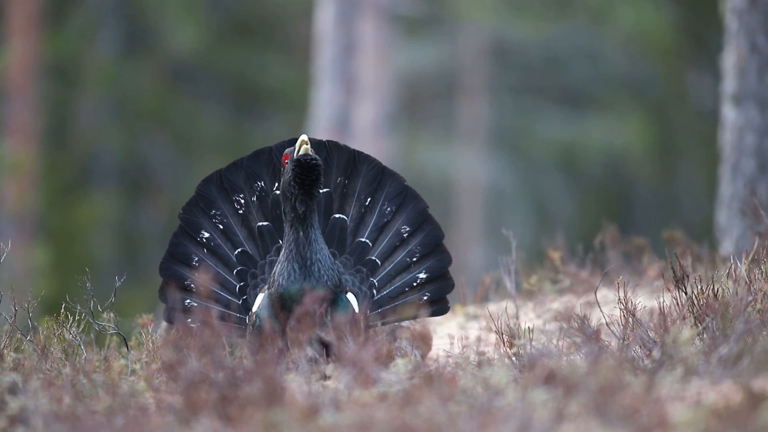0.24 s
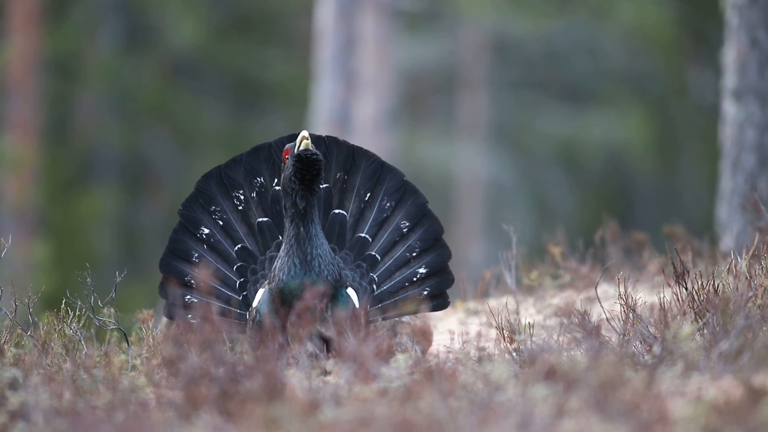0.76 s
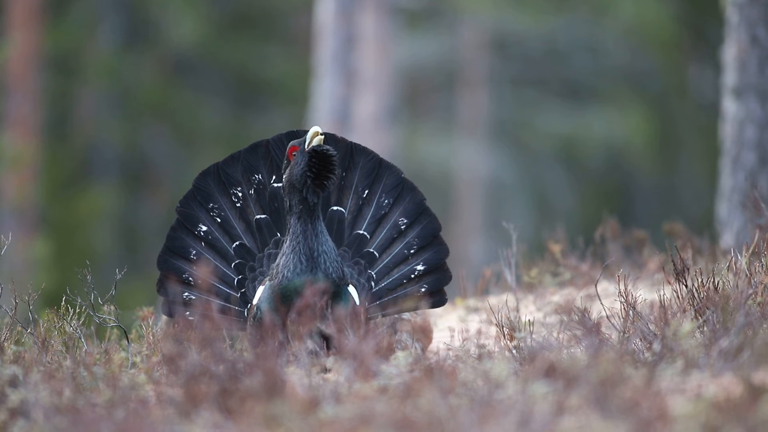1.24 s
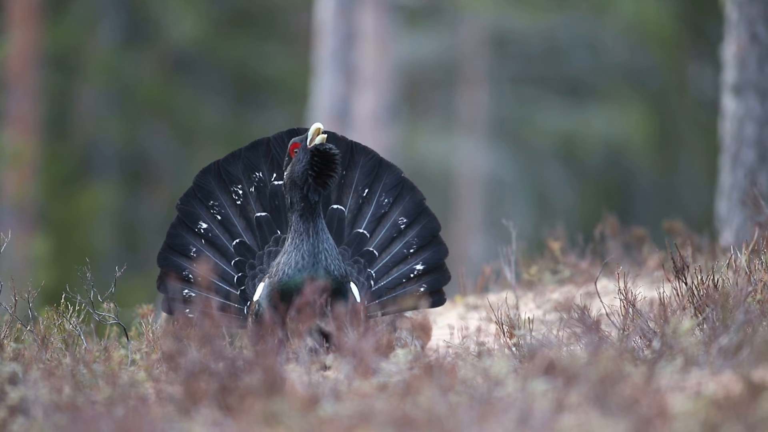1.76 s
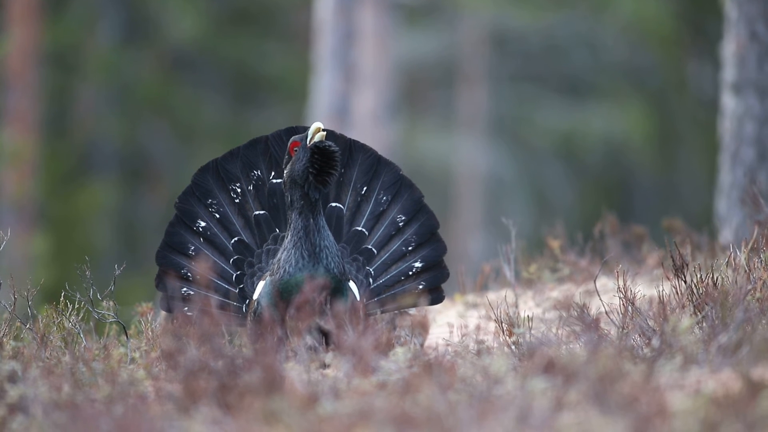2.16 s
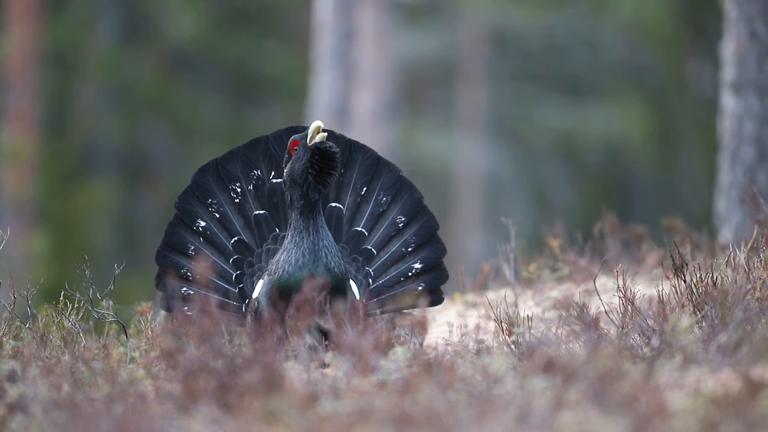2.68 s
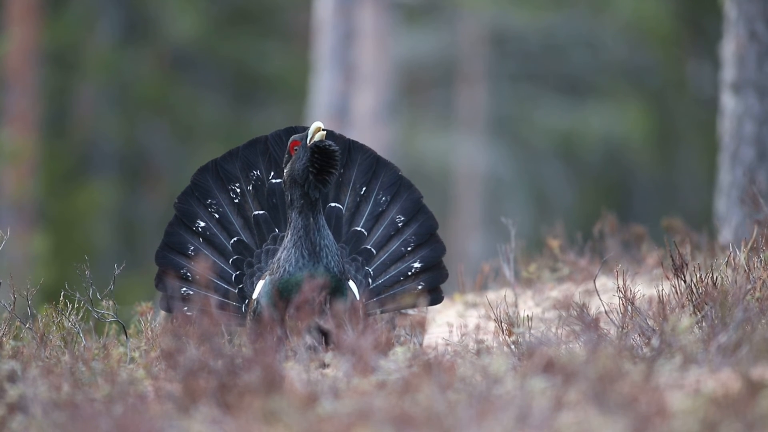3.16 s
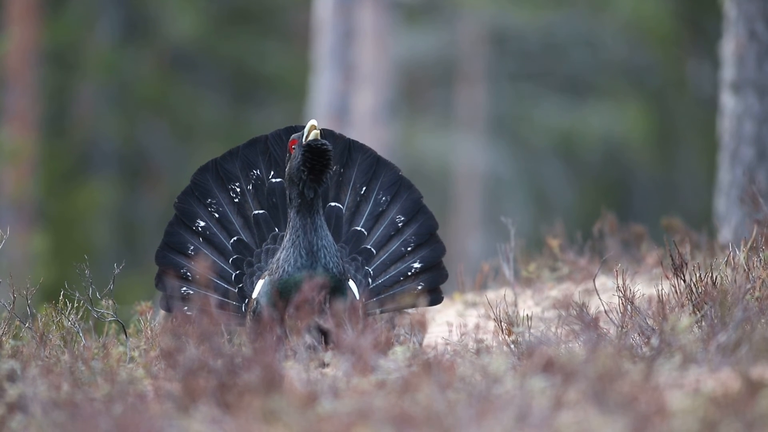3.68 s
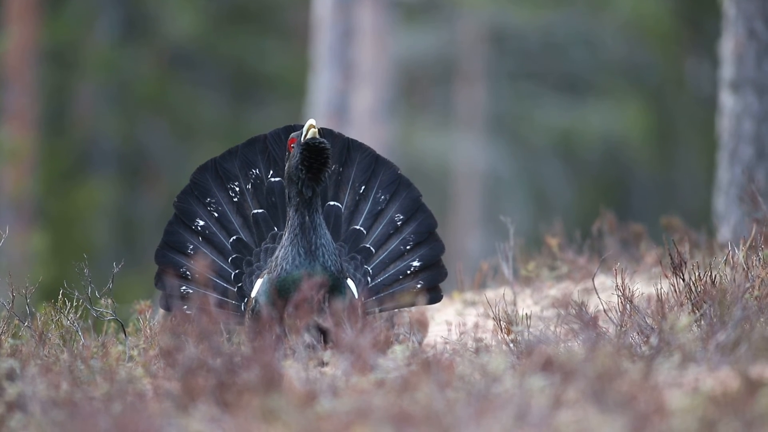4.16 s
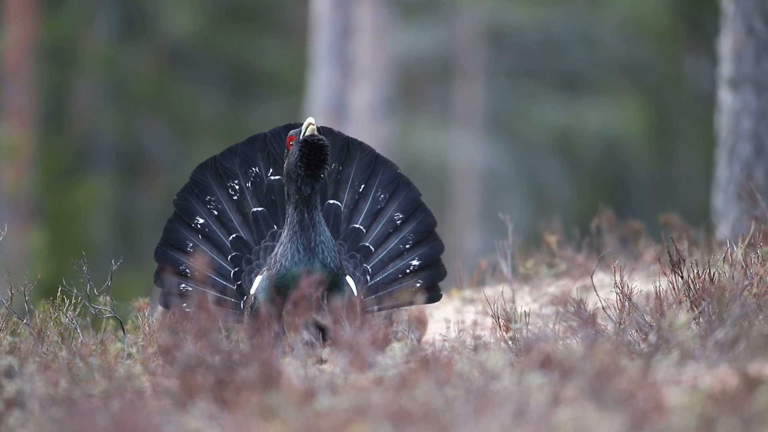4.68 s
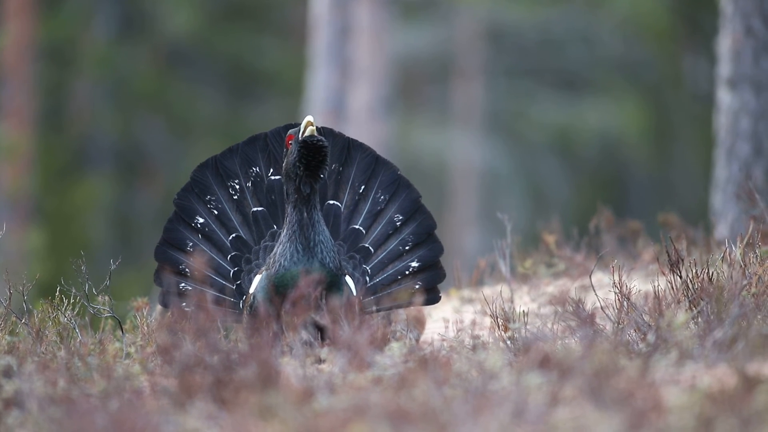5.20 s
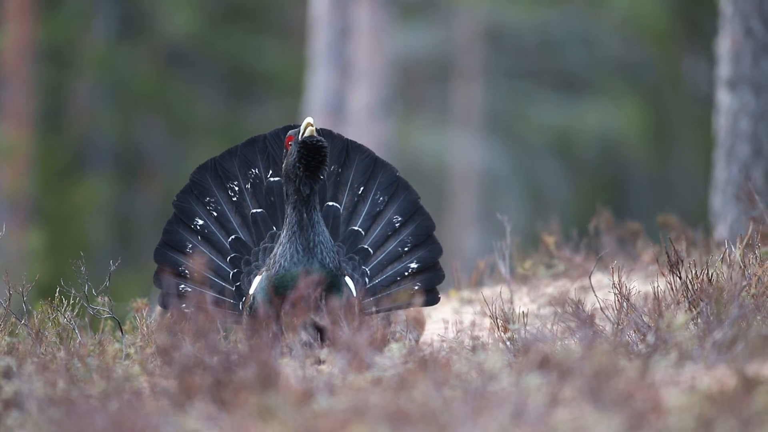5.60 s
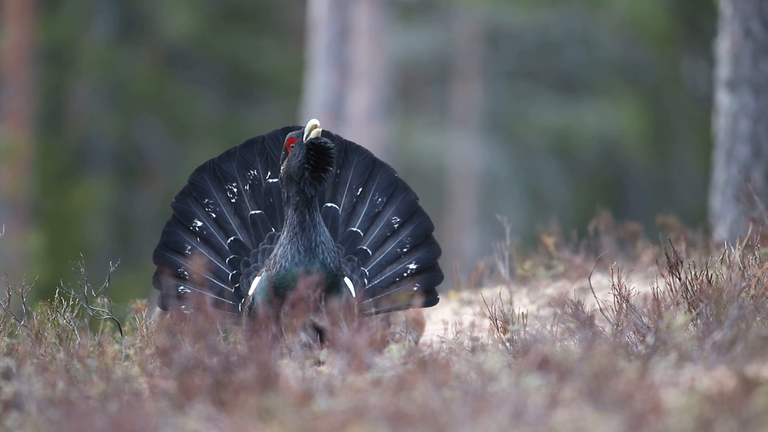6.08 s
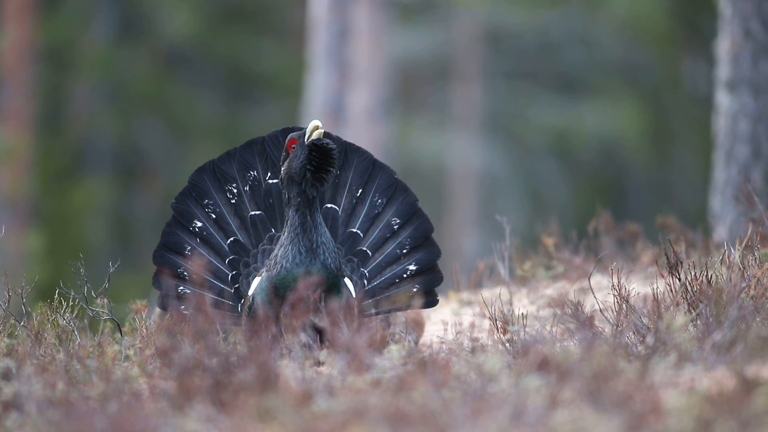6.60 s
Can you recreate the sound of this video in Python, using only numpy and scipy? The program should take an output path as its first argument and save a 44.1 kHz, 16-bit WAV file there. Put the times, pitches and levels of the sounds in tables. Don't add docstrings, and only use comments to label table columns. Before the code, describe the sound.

In a quiet woodland, a large grouse displays near the microphone. Its dry, hollow, knocking clicks come in pairs about an eighth of a second apart, at roughly 0.2, 1.1, 1.9, 2.8, 3.7 and 5.1 seconds, each ringing very briefly with a small bright snap and faint echoes from trunks. Soft deep body thumps fall at about 0.2, 1.1, 2.0 and 4.4 seconds, the first weak and the later two strongest. Far away, two tits whistle high alternating notes, one through most of the scene, the other at the start and again after 5 seconds. A distant thrush adds thin syllables, growing busy from 2 to 4 seconds with piping, downward swoops and scratchy warbles, then sparse until about 5.6 seconds. The last second has only whistles above uneven low rumble, forest air and gentle hiss.

```python
import sys
import numpy as np
from scipy import signal
from scipy.fft import rfft, irfft, next_fast_len
from scipy.io import wavfile
from scipy.ndimage import uniform_filter1d, map_coordinates

SR = 44100
rng = np.random.default_rng(int(sys.argv[2]) if len(sys.argv) > 2 else 0)


def bounce(signal):
    frames = np.transpose(np.atleast_2d(signal))
    limited = np.clip(frames, -1, 1)
    pcm = np.round(limited * 32767).astype(np.int16)
    wavfile.write(sys.argv[1], SR, pcm)


def volts(x):
    e = np.asarray(x, float) / 20
    return 10 ** e


N = 302085


def unit(x):
    return x / np.sqrt(np.mean(x ** 2) + 1e-20)


def along(points, hz):
    f, v = np.transpose(points)
    return np.interp(np.log(hz + 1), np.log(f + 1), v)


def filtered(x, response):
    m = next_fast_len(len(x) + SR // 2)
    spectrum = rfft(x, m) * response(np.fft.rfftfreq(m, 1 / SR))
    return irfft(spectrum, m)[:len(x)]


def add(track, s, sound):
    start = round(s * SR)
    sound = sound[..., max(-start, 0):]
    part = track[..., max(start, 0):][..., :sound.shape[-1]]
    part += sound[..., :part.shape[-1]]


def forest(x, reach=1, size=19000):
    # frequency in Hz, time to fade by 60 dB in seconds
    fading = [(300, 0.6), (2000, 0.72), (3500, 0.79), (6000, 0.44), (12000, 0.41)]
    hz, t, z = signal.stft(rng.standard_normal((2, size)), SR, nperseg=256)
    fade = volts(-60 * t / reach / along(fading, hz)[:, None])
    mid, side = signal.istft(z * fade, SR, nperseg=256)[1]
    left = mid + volts(-59.0) * side
    right = mid - volts(-52) * side
    tails = np.array([left, right]) / np.linalg.norm(mid)
    late = np.pad(x, (200, 0))
    return signal.fftconvolve(late[None], tails, axes=1)


def windpipe(modes, stretch, db, bright_db, beak_hz, beak_db):
    beak_width_hz, pivot_hz = 130, 2800
    short_hz, long_hz, short_db, long_db = np.transpose(modes)
    hz = short_hz + stretch * (long_hz - short_hz)
    level_db = short_db + stretch * (long_db - short_db) + db
    beak = np.exp(-((hz - beak_hz) / beak_width_hz) ** 2)
    return hz, level_db + beak_db * beak + bright_db * np.log2(hz / pivot_hz)


def ringing(hz, db, factor, sac_db):
    # frequency in Hz, time to fade by 60 dB in seconds
    ring_times = [(280, 0.03), (820, 0.09), (1450, 0.07), (2150, 0.029), (2800, 0.025), (3200, 0.027),
                  (4000, 0.021), (7000, 0.017)]
    t = np.arange(SR // 8) / SR
    turn_hz = 1800
    t60 = factor ** np.sign(hz - turn_hz) * along(ring_times, hz)

    lag_s = .00047
    turns = .1 - .28 * (hz > hz[4])
    waves = np.sin(2 * np.pi * (hz[:, None] * (t - lag_s) + turns[:, None]))
    decay = volts(-60 * t / t60[:, None]) * waves

    sac_start, sac_end, rise_s, swell_s = 0.67, 1.4, 0.0074, 0.0034
    sac_hz = hz[0] * (sac_end + (sac_start - sac_end) * np.exp(-t / rise_s))
    swell = t / swell_s * np.exp(1 - t / swell_s)
    decay[0] = volts(sac_db) * swell * np.sin(2 * np.pi * np.cumsum(sac_hz) / SR) / 2

    ring = (volts(db + 3.0) * 0.038 / t60) @ decay
    return ring * (1 - np.exp(-(t / .0004) ** 2))


def snap():
    # frequency in Hz, gain as a plain factor
    colour = [(3000, 0.18), (6500, 0.47), (8000, 0.86), (10000, 0.55), (12500, 0.39), (15000, 0.29)]
    t = np.arange(SR // 8) / SR
    burst = rng.standard_normal(len(t)) * volts(-60 * t / 0.037)
    return filtered(burst, lambda hz: along(colour, hz))


def clicks():
    # first click in seconds, second click in seconds
    pairs = [(0.1961, 0.3308), (1.0858, 1.2099), (1.905, 2.0376), (2.8353, 2.9669), (3.7175, 3.8534),
             (5.1426, 5.2939)]
    # Hz with short neck, Hz with long neck, level short in dB, level long in dB
    first_modes = [(243, 250, -49.5, -32), (830, 820, -52, -40.5), (1493, 1440, -38, -36),
                   (2174, 2124, -32, -36), (2847, 2605, -29.5, -36), (3330, 2960, -37.5, -30.5),
                   (4020, 4000, -41, -73), (4320, 4020, -50, -40.5), (5080, 4560, -55, -49),
                   (5710, 5150, -53, -54), (6300, 5880, -58.5, -51.5), (6800, 6450, -82, -62.5)]
    second_modes = [(264, 305, -49, -50), (860, 805, -46.5, -54.5), (1503, 1438, -39.5, -51.5),
                    (2150, 2080, -43.5, -43), (2750, 1900, -44, -34), (3270, 2986, -44, -37.5),
                    (3950, 3560, -47, -58), (4290, 3900, -44.5, -54.5), (4900, 4400, -56, -67),
                    (5350, 5120, -61, -55), (6460, 5770, -55, -60.5), (6900, 7400, -85, -74)]
    ring_factors = [.95, 1.35]
    # neck stretch 0-1, strength in dB, brightness in dB per octave,
    # beak cavity in Hz, its lift in dB
    efforts = [(.02, 1, 0.7, 4750, -1), (.02, 0, 0.5, 2830, -11), (.2, 1.2, 0.7, 4270, -7),
               (.25, 0.9, 0.9, 3220, 2.5), (.42, 0.4, 1, 4160, -18), (.55, 3, 2, 2150, -20),
               (.6, -0.2, 1.7, 3310, -18), (.65, 1, 2.1, 3600, 2), (.8, -0.5, 2.5, 3200, -38),
               (.9, 1.5, 2.3, 3510, 13), (1.03, -1.5, 3.4, 3750, 11.5), (.98, 1, 0.5, 1440, -16)]
    # fifth mode in Hz, its lift in dB,
    # sixth mode in Hz, its lift in dB, air sac lift in dB
    throats = [(2820, 0.5, 3400, -1, 2.5), (2812, -1, 3305, 1, -1), (2760, 1, 3300, 0.5, .3),
               (2775, -1, 3160, 2.5, 1.2), (2730, 2, 3150, -3, .3), (2686, 2, 3050, 2, 1),
               (2680, 2.5, 3070, -6, 1), (2686, 1.5, 3045, 0, 4), (2620, -0.5, 2940, -15, 1),
               (2570, -0.3, 3130, -0.5, 3), (2578, 0, 3022, -1, 0.5), (2550, -1.5, 3010, 1, 1)]
    # seventh, eighth, ninth and tenth mode in Hz
    uppers = [(3887, 4393, 5168, 5830), (3994, 4296, 4985, 5400), (3822, 4231, 4974, 5539),
              (3747, 4188, 4963, 5400), (3806, 4118, 4748, 5399), (4210, 3973, 4802, 5448),
              (3644, 4156, 4667, 5184), (4172, 3903, 4590, 5211), (3500, 4107, 4506, 5098),
              (3564, 4102, 4500, 5206), (3540, 3989, 4560, 5206), (3560, 3898, 4587, 5211)]
    # delay in seconds, level in dB
    trunks = [
        (.0105, -27),
        (.041, -33),
    ]

    out = np.zeros((2, N))
    starts = np.ravel(pairs) - .0003
    for i, (s, effort, throat, upper) in enumerate(zip(starts, efforts, throats, uppers)):
        modes = [first_modes, second_modes][i % 2]
        hz, db = windpipe(modes, *effort)
        fifth_hz, fifth_db, sixth_hz, sixth_db, sac_db = throat
        hz[4:6] = fifth_hz, sixth_hz
        hz[6:10] = upper
        db[4:6] += [fifth_db, sixth_db]
        db[0] += sac_db
        click = sac_click(hz, db, ring_factors[i % 2])
        add(out, s, click)
        for delay, echo_db in trunks:
            add(out, s + delay, volts(echo_db + rng.normal(0, 3.2)) * click)
        add(out, s, volts(-16.5) * forest(click, reach=0.36, size=9000))
        add(out, s, volts(-24.5) * forest(click, reach=3.8, size=32000))
    return out


def sac_click(hz, db, factor):
    return ringing(hz, db, factor, sac_db=5) + volts(-51.5) * snap()


def thumps():
    # start in seconds, peak level in dB
    pushes = [
        (0.2321, -22.5),
        (1.084, -16.2),
        (2.0365, -12.8),
        (4.4392, -12.2),
    ]
    # frequency in Hz, width in Hz
    low_peaks = [(63, 10.8), (75.8, 32.4), (102.3, 21)]

    def chain(hz):
        peaks = [1j * hz * w / (c * c - hz * hz + 1j * hz * w) for c, w in low_peaks]
        return np.prod(peaks, axis=0) / (1 + 1j * hz / 207) ** 2

    push = np.eye(1, SR // 2)[0]
    shape = filtered(push, chain)
    t = np.arange(SR // 2) / SR
    out = np.zeros(N)
    for s, db in pushes:
        add(out, s, volts(db) * shape / shape.max())
        smear = rng.standard_normal(len(t)) * np.exp(-((t - .27) / 0.18) ** 2)
        add(out, s, volts(db - 43.5) * unit(filtered(smear, chain)))
    return out * volts([[.15], [-.15]])


def whistle(rows, flutter_db, edge_s, warble_hz=240):
    s, hz, db, depth = np.transpose(rows)
    t = np.arange(s.min(), s.max() + 0.0022, 1 / SR)

    def drift(size):
        rough = rng.standard_normal(len(t))
        return unit(uniform_filter1d(uniform_filter1d(rough, size), size))

    shake = np.sin(np.cumsum(2 * np.pi * warble_hz / SR * (1 + 0.345 * drift(size=200))))
    glide = uniform_filter1d(np.interp(t, s, hz), size=130)
    pitch = glide + np.interp(t, s, depth) * shake + 15 * drift(size=400)
    edge = np.clip(np.minimum(t - t[0], t[-1] - t) / edge_s, 0, 1)
    level = volts(np.interp(t, s, db) + flutter_db * drift(size=350))
    return np.sqrt(2) * edge * level * np.sin(2 * np.pi * np.cumsum(pitch) / SR)


def in_trees(phrases, direct_db, early_db, echo_db, flutter_db, edge_s):
    out = np.zeros((2, N))
    for rows in phrases:
        voice = whistle(rows, flutter_db, edge_s)
        start = np.min(rows, axis=0)[0]
        add(out, start, volts(direct_db) * voice)
        for delay, size in zip(.06 * rng.random(6), rng.standard_normal(6)):
            add(out, start + delay, volts(early_db) * size * voice)
        add(out, start, volts(echo_db) * forest(voice))
    return out


def repeated(shape, notes, depth_hz=0):
    phrases = []
    for (s, db, length, *raised), k in zip(notes, rng.normal(1, 0.002, len(notes))):
        phrases.append([(s + ds * length, hz * k + sum(raised), db + ddb, depth_hz)
                        for ds, hz, ddb in shape])
    return phrases


def syllables(shape, rows, depth_hz=0):
    return [[(s + u * length, first + way * (second - first), db + ddb, depth_hz)
             for u, way, ddb in shape]
            for s, length, first, second, db in rows]


def tits():
    # seconds from start, pitch in Hz, level in dB
    low = [(0, 3510, -4.5), (.03, 3373, -0.5), (.08, 3315, -1), (.2, 3285, -0.5)]
    low_answer = [(0, 4437, -1), (.04, 4400, 5), (.14, 4365, -2)]
    high = [(0, 3880, 3), (.022, 4130, 1), (.1, 4140, 0), (.19, 4040, -7)]
    high_answer = [(0, 5100, -4), (.06, 4850, -3.5), (.1, 4700, 1), (.21, 4710, -9)]
    # start in seconds, level in dB, length factor, perhaps a rise in Hz
    low_notes = [(0.331, -94, 0.73), (1.39, -62.5, 0.84), (1.925, -62, 0.884), (2.5, -61, 1, 54),
                 (3, -61, 1.1, 35), (3.5, -60.5, 0.86, 55.5), (4.072, -65, 1.07), (4.646, -65.5, 0.91),
                 (5.246, -60, 0.71), (5.802, -63, 0.94), (6.354, -60, 0.805)]
    low_answers = [(1.684, -75.5, 1), (2.224, -73, 0.76), (2.747, -74, 1.3), (3.26, -70, 1.05),
                   (3.804, -71.5, 1.22), (4.36, -71, 0.85), (4.921, -73, 0.94), (5.518, -73, 1.5),
                   (6.079, -70.5, 1.4), (6.624, -71, 0.98)]
    high_notes = [(-.03, -68, 0.84), (0.445, -70, 0.92), (.967, -67, 0.91), (5.129, -68, 0.81),
                  (5.607, -66, 1.07), (6.089, -67, 1.2), (6.577, -67, 1.04)]
    high_answers = [(.12, -69, 1.1), (.61, -67, 0.93), (1.14, -67, 0.92), (5.29, -72, .9),
                    (5.785, -66, 0.81), (6.27, -72.5, 1.04), (6.74, -68, 1.6)]

    low_song = repeated(low, low_notes) + repeated(low_answer, low_answers)
    high_song = repeated(high, high_notes) + repeated(high_answer, high_answers, depth_hz=105)
    return in_trees(low_song + high_song, direct_db=-2.5, early_db=-19.5, echo_db=-4.5,
                    flutter_db=1.5, edge_s=0.0083)


def thrush():
    # seconds from start, pitch in Hz, level in dB
    piping = [(0, 1695, -6), (.03, 1947, -1.5), (.068, 2010, -8)]
    swoop = [(-.035, 2640, -5), (-.004, 3400, -24.5), (0, 3734, -4), (.02, 3000, 0.5), (.04, 2663, 5.5)]
    # start in seconds, level in dB, length factor
    pipings = [(2.076, -66, 0.85), (2.241, -63.5, 0.64), (2.414, -67.5, 0.78), (2.596, -68.5, 1.15),
               (2.768, -66, 0.76), (2.944, -66.5, 0.9), (3.25, -67, 0.75)]
    swoops = [(2.402, -60.5, 0.8), (2.555, -59.5, 0.89), (2.708, -55.5, 0.9), (2.857, -55, 0.68)]
    # share of length, share of the way from first to second pitch, level in dB
    glide = [(0, 0.0035, 3.5), (.5, .5, -1), (1, 0.94, 1)]
    settle = [(0, 0, 3), (.35, .7, -2), (1, 1, -3)]
    flick = [(0, 0, -24), (.35, .4, -16), (.6, 1, -9), (1, .76, 0)]
    crest = [(0, 0, -10), (.25, .4, -1), (.62, .62, 0), (.87, 1, -2), (1, .55, -10)]
    hook = [(0, .5, -5), (.25, .88, -2), (.55, 1, 0), (.75, .9, -1), (1, 0, -14)]
    arch = [(0, .3, 1), (.12, .36, -13), (.32, .8, 1.5), (.54, 0.99, -11), (.66, .9, -6), (.73, .76, 7),
            (.8, .58, -8), (1, 0.015, -18)]
    # start in seconds, length in seconds, first Hz, second Hz, level in dB
    glides = [(.125, .065, 2800, 2940, -80), (1.722, 0.05, 2000, 1995, -72.5),
              (.81, 0.15, 1990, 1930, -77.5), (1.55, .035, 1868, 1950, -77), (2.495, .015, 3720, 4400, -74),
              (2.66, .009, 4600, 4950, -70), (3.172, 0.019, 2595, 2940, -58),
              (3.466, 0.022, 2820, 2710, -60.5), (3.614, 0.0072, 4470, 4080, -65),
              (3.62, .018, 3680, 3640, -66), (3.638, 0.03, 4100, 4670, -71), (3.8, 0.077, 2726, 2790, -64),
              (4.118, 0.014, 3340, 3110, -63), (4.243, 0.03, 2610, 3150, -66), (4.6, .03, 3450, 3490, -75),
              (4.628, 0.014, 3500, 2895, -66), (4.652, 0.021, 4600, 4800, -75),
              (4.67, 0.12, 4290, 4230, -76.5), (4.7, 0.016, 2600, 2940, -66),
              (5.055, 0.043, 3800, 3500, -74), (5.53, 0.0066, 3020, 3750, -64.5)]
    settles = [(0.886, 0.2, 3300, 3270, -72), (1.52, 0.11, 2576, 2530, -73), (1.82, 0.043, 5170, 4150, -77),
               (2.216, 0.061, 5070, 4160, -71), (4.137, .023, 2630, 2080, -69),
               (4.692, 0.0084, 3350, 2550, -65), (5.546, .05, 3270, 3150, -73)]
    flicks = [(3.13, .033, 1368, 3110, -53.5)]
    crests = [(4.845, 0.084, 2590, 3205, -59)]
    hooks = [(.705, 0.056, 2480, 2737, -65.5), (1.47, 0.067, 2500, 2786, -65.5),
             (3.036, 0.038, 1330, 2450, -57.5), (3.235, 0.043, 1156, 2434, -58.5)]
    arches = [(3.488, .084, 1518, 3155, -51.5)]
    burrs = [(0, 0.1, 2677, 2794, -67), (2.944, .03, 3100, 2850, -58), (3.338, 0.075, 3526, 3635, -63),
             (3.405, .07, 3660, 3530, -62.5)]
    rasps = [(0.769, 0.21, 2540, 2456, -73), (1.55, 0.17, 2540, 2400, -79), (2.974, 0.043, 2947, 3120, -56),
             (3.187, 0.041, 3330, 2980, -59.5), (3.19, 0.02, 3510, 3330, -63),
             (3.35, 0.18, 3130, 2687, -65.5)]
    # time in seconds, pitch in Hz, level in dB
    gargle = [(3.75, 1892, -68), (3.79, 2050, -60), (3.82, 3130, -59), (3.865, 3520, -59.5),
              (3.91, 2855, -57), (3.95, 2026, -63), (4.01, 1876, -71)]

    notes = repeated(piping, pipings) + repeated(swoop, swoops)
    clean = syllables(glide, glides) + syllables(settle, settles) + syllables(flick, flicks)
    clean += syllables(crest, crests) + syllables(hook, hooks) + syllables(arch, arches)
    harsh = syllables(glide, burrs, depth_hz=121) + syllables(glide, rasps, depth_hz=370)
    harsh.append([(*point, 300) for point in gargle])
    return in_trees(notes + clean + harsh, direct_db=2.5, early_db=-21, echo_db=-3.0,
                    flutter_db=1.5, edge_s=0.0029)


def wobble(rate):
    knots = rng.standard_normal(int(N * rate / SR) + 4)
    return map_coordinates(knots, [np.arange(N) * rate / SR])


def noise(spectrum):
    return unit(filtered(rng.standard_normal(N), lambda hz: volts(along(spectrum, hz))))


def background():
    # time in seconds, rumble level in dB
    rumble_level = [(0.0, -49), (0.8, -53), (1.12, -54.5), (1.49, -54), (2.0, -53.5), (2.13, -52),
                    (2.29, -53.5), (2.65, -52), (3.34, -53.5), (4.03, -54), (4.64, -49.5), (4.94, -54),
                    (5.44, -52), (5.57, -53.5), (5.89, -53.5), (6.14, -54), (6.85, -51)]
    # frequency in Hz, level in dB per Hz
    rumble = [(12, -77), (20, 2.5), (32, -12.5), (49, 0), (70, 4.5), (102, 0), (125, -10.5), (156, -2),
              (171, -6.5), (184, -25), (230, -36), (300, -29), (510, -120)]
    air = [(120, -8.5), (200, 0), (431, -7), (546, -7), (877, -16.5), (1150, -18.5), (2770, -20.5),
           (3330, -19), (3850, -22), (4220, -21), (4620, -23), (13300, -26), (15700, -27)]
    # frequency in Hz, share in dB
    air_side = [(60, -32), (130, -28), (290, -18), (640, -13.5), (1410, -6.5), (3100, -11.5), (6820, -3.5),
                (15000, -3.5)]

    s, db = np.transpose(rumble_level)
    rumble_db = np.interp(np.arange(N) / SR, s, db) + 2.0 + 2.0 * wobble(6)

    def layer():
        return volts(rumble_db) * noise(rumble) + volts(-60.0) * noise(air)

    mid = layer()
    side = filtered(layer(), lambda hz: volts(np.minimum(along(air_side, hz), -2)))
    return np.array([mid + side, mid - side])


def scene():
    return clicks() + thumps() + tits() + thrush() + background()


def roll_off(x):
    return signal.sosfilt(signal.butter(12, 16160, fs=SR, output="sos"), x)


def record(dry):
    kept = np.array([filtered(channel, lambda hz: hz < 15760) for channel in dry])
    return roll_off(kept)


dry = scene()
out = record(dry)
bounce(out)
```